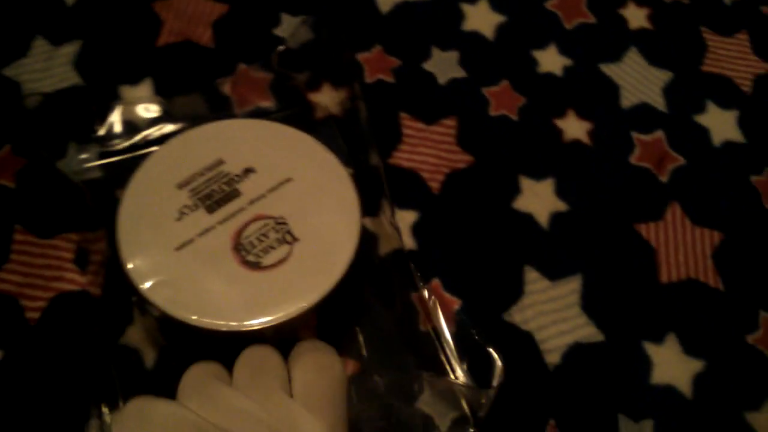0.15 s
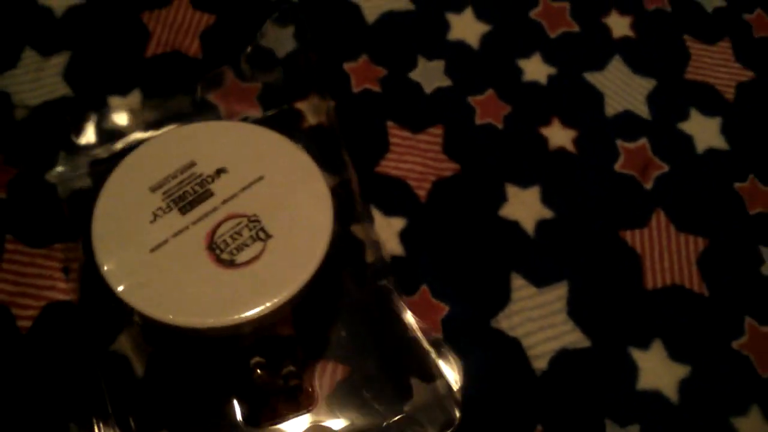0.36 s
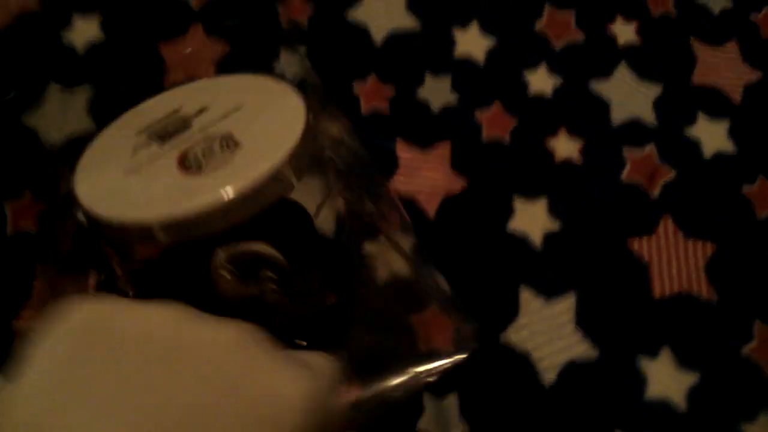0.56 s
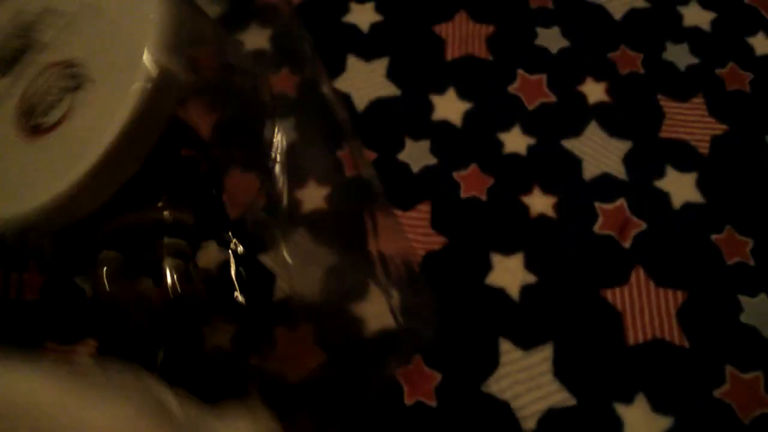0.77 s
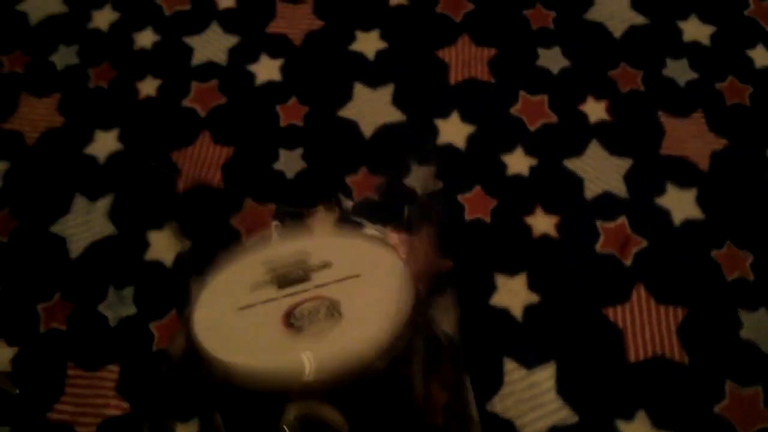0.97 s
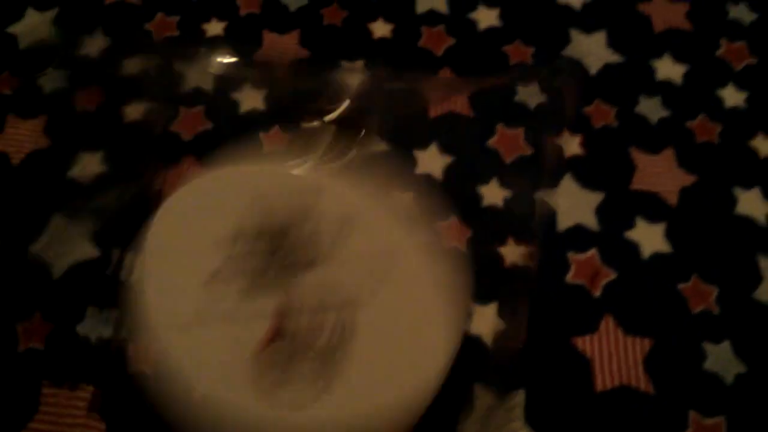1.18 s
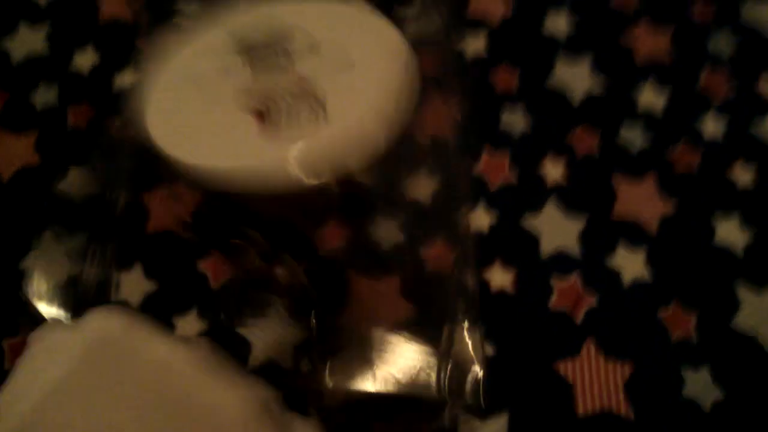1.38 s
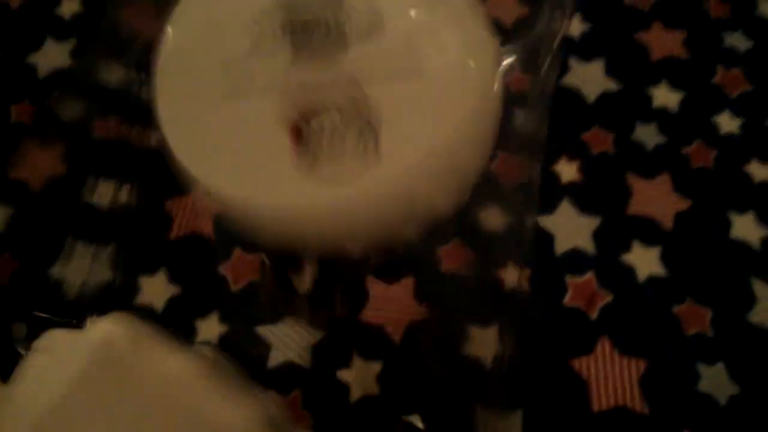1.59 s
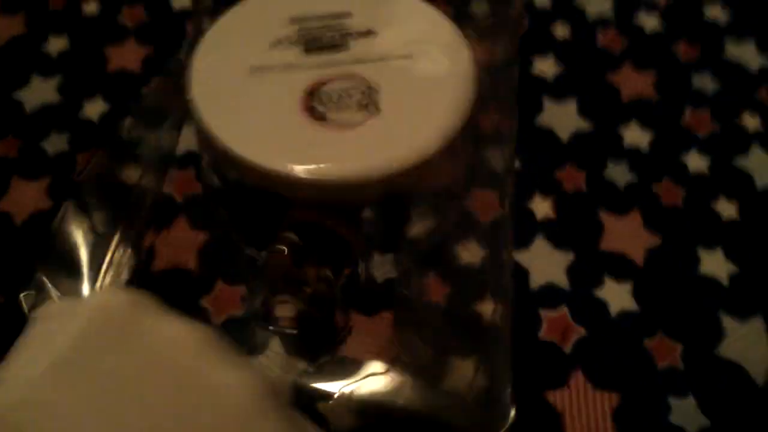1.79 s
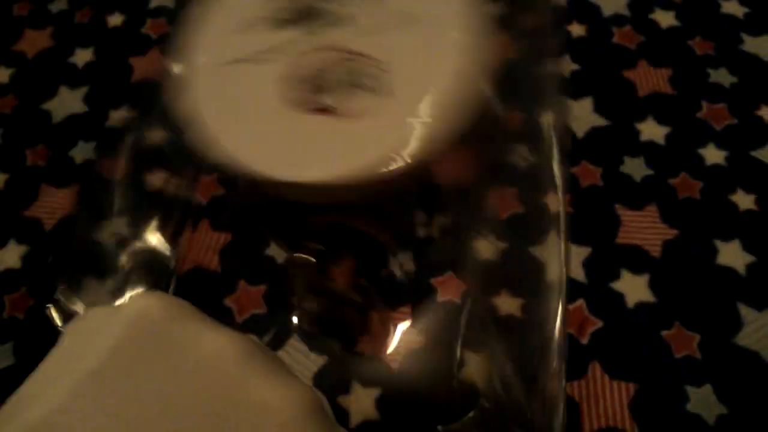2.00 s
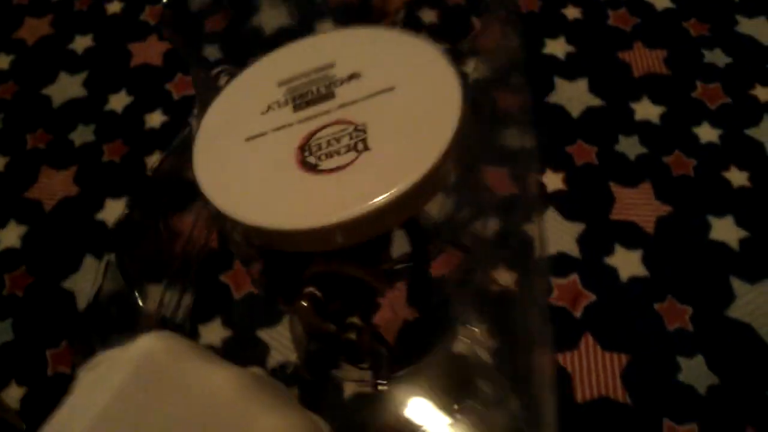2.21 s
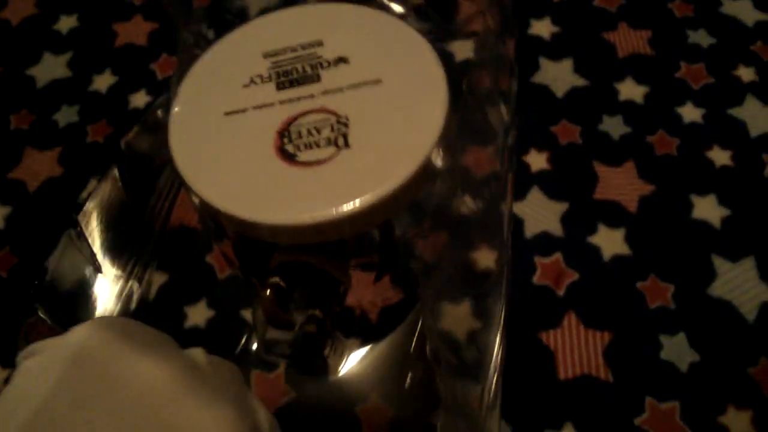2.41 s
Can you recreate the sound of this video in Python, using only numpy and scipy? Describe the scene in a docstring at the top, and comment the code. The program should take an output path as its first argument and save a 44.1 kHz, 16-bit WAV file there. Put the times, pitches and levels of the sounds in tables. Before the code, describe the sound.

A stiff plastic bag is handled close to the microphone in a small room. It gives a few loud snaps, pops hollowly once, then crumples densely before trailing off in faint crackles.

```python
"""Crumpling a stiff plastic bag

A bag with a hard disc inside is picked up and turned, close to a mono microphone in a small room.
Creases buckle in loud snaps, each ringing a panel of the sheet; taut panels pop hollowly.
Fingers knead it into a dense crumple, with low pushes of the hand. The sheet slides once with a
thin hiss and settles in tiny crackles. The loudest snaps overload the microphone."""
import sys
import numpy as np
from scipy import signal
from scipy.fft import rfft, irfft, next_fast_len
from scipy.io import wavfile

SR = 44100
rng = np.random.default_rng(int(sys.argv[2]) if len(sys.argv) > 2 else 0)


def file_out(sig):
    """Save sig as 16-bit WAV at sys.argv[1]."""
    # one column per channel
    cols = np.atleast_2d(sig).T
    # limit, then scale
    lim = np.clip(cols, -1, 1)
    pcm = np.round(lim * 32767).astype(np.int16)
    wavfile.write(sys.argv[1], SR, pcm)


N = 108045

# buckling creases (time [s], panel level [dB], panel pitch [Hz], crack level [dB], fizz level [dB])
SNAPS = [(0.127, -41.5, 1210, -52.5, -85), (0.185, -47, 1170, -58.5, -91), (0.2389, -19, 1275, -19, -36),
         (0.2523, -17, 616, -27, -65), (0.3057, -11, 1324, -14.5, -18), (0.3716, -15, 768, -27.5, -74),
         (0.4085, -5.5, 659, -11, -25.5), (0.4125, -12, 612, -32.5, -47), (0.4617, -5, 1034, -17, -25.5),
         (0.636, -27, 1029, -40, -77), (0.671, -37, 1220, -50, -80),  (0.745, -32.5, 1093, -50, -85),
         (0.776, -32, 1320, -48, -84), (0.783, -27, 1170, -43, -86), (0.8034, -12, 1105, -12.5, -9),
         (0.833, -24, 876, -31, -32.5), (0.976, -17, 849, -33.5, -60), (1.0334, -13.5, 873, -39, -69),
         (1.0446, -17, 1092, -24.5, -66), (1.056, -11.5, 1067, -49, -66), (1.147, -15.5, 1140, -24.5, -40),
         (1.1662, -11, 949, -26.5, -34.5), (1.1906, -12.5, 630, -27.5, -36.5),
         (1.209, -19, 650, -24, -33.5), (1.2561, -14.5, 670, -24, -29), (1.273, -16, 665, -31, -54),
         (1.3285, -26.5, 772, -30, -50.5), (1.3731, -7, 1407, -17, -22), (1.4432, -13.5, 861, -26, -52),
         (1.465, -19.5, 655, -28.5, -37), (1.488, -13, 890, -29.5, -68), (1.5224, -11, 1430, -18, -40),
         (1.532, -18, 652, -23, -30.5), (1.587, -23.5, 908, -33.5, -55), (1.6098, -12, 710, -23.5, -55),
         (1.619, -33, 820, -22.5, -33), (1.635, -10, 1266, -36, -64.5), (1.651, -13.5, 778, -49, -51.5),
         (1.683, -16, 1030, -23, -40), (1.7185, -31.5, 780, -31, -44.5), (1.741, -16, 923, -58.5, -74),
         (1.7648, -20, 942, -22, -44), (1.814, -19.5, 1060, -23.5, -33.5), (1.8335, -23.5, 790, -24, -53),
         (1.893, -18.5, 1000, -32, -59), (2.028, -26.5, 933, -49, -77.5), (2.0669, -28.5, 1225, -33.5, -55),
         (2.176, -27.5, 1350, -39.5, -79), (2.2111, -33, 1280, -50, -88.5)]
# panel modes (pitch ratio, level [dB], t60 [s])
PANEL_MODES = [(0.502, -8.5, 0.013), (1, 5.5, 0.012), (1.33, -8.5, 0.016), (1.8, -9.5, .01)]
# uneven shaking of a panel (pitch ratio, level [dB])
FLUTTER_SPECTRUM = [(.25, -49), (.58, -5), (1, 5.5), (1.6, -5.5), (2.4, -17), (4.5, -53)]
# crack of a crease (frequency [Hz], level [dB])
CRACK_SPECTRUM = [(1000, -35.5), (2300, 5.5), (3300, -2), (4500, 0), (5300, -9), (6400, -21.5), (7800, -39),
                  (12000, -48.5)]
# fizz of a crease (frequency [Hz], level [dB])
FIZZ_SPECTRUM = [(3500, -28.5), (5500, 3.5), (6600, 7), (8000, -5), (9300, -4.5), (10500, -12),
                 (14000, -14)]
SNAP_ATTACK_S, FLUTTER_T60_S, CRACK_T60_S, FIZZ_T60_S = 0.00058, 0.027, 0.022, 0.014


def snaps():
    """Each crease flips at once with a crack and fizz; its panel rings and shakes briefly."""
    out, t = np.zeros(N + SR), np.arange(SR // 12) / SR
    attack = 1 - np.exp(-t / SNAP_ATTACK_S)

    def unit_onset(x):  # rms 1 over the first 5 ms
        return x / np.sqrt(np.mean(x[:SR // 200] ** 2))

    def burst(spectrum, t60_s):
        return unit_onset(coloured(rng.standard_normal(len(t)) * fade(t, t60_s) * attack, spectrum))

    for start_s, panel_db, pitch_hz, crack_db, fizz_db in SNAPS:
        ring = np.zeros(len(t))
        for ratio, mode_db, t60_s in PANEL_MODES:
            gain = amp(mode_db + rng.normal(0, 4))
            mode_hz = pitch_hz * ratio * (1 + rng.normal(0, 0.029))
            ring += gain * fade(t, t60_s) * np.sin(2 * np.pi * mode_hz * t)
        highpass = signal.butter(2, pitch_hz / 2, "high", fs=SR, output="sos")
        ring = unit_onset(signal.sosfilt(highpass, ring * attack))
        flutter = burst([(ratio * pitch_hz, db) for ratio, db in FLUTTER_SPECTRUM], FLUTTER_T60_S)
        flutter_db = -1.5 + 0.14 * panel_db  # harder snaps shake more
        panel = amp(panel_db) * (ring + amp(flutter_db) * flutter)
        crack = amp(crack_db) * burst(rippled(CRACK_SPECTRUM, ripple_db=2.5), CRACK_T60_S)
        fizz = amp(fizz_db) * burst(FIZZ_SPECTRUM, FIZZ_T60_S)
        out[round(start_s * SR):][:len(t)] += panel + crack + fizz
    return out[:N]


# taut panels (time [s], pitch [Hz], level [dB], t60 [s])
POPS = [(.3055, 1017, -7, .045), (.409, 447, -3, 0.024), (.4095, 3940, -22, .035), (.462, 1040, -11, .04),
        (.8035, 622, 7.5, .016), (.806, 723.4, -11.5, .15), (.806, 927, -19, .12), (.804, 245.6, -22, .16),
        (1.222, 238, -10, .04), (1.24, 300, -20, .04), (1.475, 640, -1.5, .025), (1.658, 600, -4, .03),
        (1.873, 292.8, -12.5, 0.16), (2.0675, 2840, -14, 0.025), (2.071, 960, -23.5, .05)]
POP_ATTACK_S, POP_WAVER_RATIO = 0.0011, 0.028


def pops():
    """A taut panel flips through and rings, its pitch wavering as it settles."""
    out, t = np.zeros(N + SR), np.arange(SR // 5) / SR
    attack = 1 - np.exp(-t / POP_ATTACK_S)
    for start_s, pitch_hz, level_db, t60_s in POPS:
        waver = np.interp(t, np.linspace(0, t[-1], 20), rng.standard_normal(20))
        hz = pitch_hz * (1 + POP_WAVER_RATIO * waver)
        ring = np.sin(2 * np.pi * np.cumsum(hz) / SR)
        out[round(start_s * SR):][:len(t)] += amp(level_db) * ring * fade(t, t60_s) * attack
    return out[:N]


# hand squeezes (peak time [s], crumple level [dB], push level [dB], rise [s], fall [s])
SQUEEZES = [(0.256, -20, -38.5, 0.0075, 0.0073), (0.412, -19.5, -26, 0.0032, 0.047),
            (0.55, -29, -64.5, 0.026, 0.014), (0.901, -39.5, -49, 0.1, 0.17),
            (1.061, -18.5, -30, 0.032, 0.038), (1.194, -16.5, -26.5, 0.033, 0.067),
            (1.268, -22, -18, 0.043, 0.062), (1.453, -11, -27, 0.012, 0.038),
            (1.5, -21.5, -29, 0.012, 0.053), (1.644, -16.5, -17.5, 0.039, 0.027),
            (1.704, -20, -20, 0.022, 0.03), (1.83, -26, -32.5, 0.045, 0.055),
            (1.907, -19, -26.5, 0.02, 0.017), (1.969, -55.5, -37.5, 0.044, 0.069),
            (2.066, -34, -44.5, 0.0073, 0.0059)]
# dull creases (frequency [Hz], level [dB])
CREASE_SPECTRUM = [(40, -29.5), (150, -23.5), (280, -4), (680, 4.5), (1050, 3), (1400, -1), (1800, -13.5),
                   (4300, -34.5), (12000, -83)]
# sharp creases (frequency [Hz], level [dB])
TICK_SPECTRUM = [(800, -25), (2300, 0), (4600, -2), (6400, -16), (8000, -29), (13500, -37)]
# low push on the bag (frequency [Hz], level [dB])
PUSH_SPECTRUM = [(20, -30.5), (45, -9), (80, -4.5), (200, -7.5), (290, 3), (420, -7.5), (800, -44),
                 (2000, -67.5)]
CREASE_DB, TICK_DB = 0.5, -18.5  # re crumple level


def crumple(t):
    """Each squeeze flips small creases, dull ones densely, sharp ones sparsely, and pushes the bag."""
    effort, push = np.zeros(N), np.zeros(N)
    for peak_s, crumple_db, push_db, rise_s, fall_s in SQUEEZES:
        from_peak = np.maximum((peak_s - t) / rise_s, (t - peak_s) / fall_s)
        swell = np.exp(-from_peak ** 1.22)
        effort += amp(crumple_db) * swell
        push += amp(push_db) * swell
    dull = amp(CREASE_DB) * grains(CREASE_SPECTRUM, per_s=380, spread_db=2.2)
    first_s, last_s = SQUEEZES[0][0], SQUEEZES[-1][0]
    sharp = amp(TICK_DB) * crackles(TICK_SPECTRUM, first_s, last_s, per_s=160, spread_db=4.8)
    return effort * (dull + sharp) + push * noise(PUSH_SPECTRUM)


# sliding hiss (frequency [Hz], level [dB])
SLIDE_SPECTRUM = [(800, -40), (2500, 3.5), (4500, -4), (7000, -13), (10000, -19), (14000, -21.5)]
SLIDE_START_S, SLIDE_END_S, SLIDE_FADE_S, SLIDE_DB = 0.4, 0.616, 0.012, -48


def slide(t):
    """The sheet slides with a thin, grainy hiss."""
    inside_s = np.minimum(t - SLIDE_START_S, SLIDE_END_S - t)
    gate = np.clip(inside_s / SLIDE_FADE_S + 1, 0, 1)
    return amp(SLIDE_DB) * gate * grains(SLIDE_SPECTRUM, per_s=4000, spread_db=7.8)


# settling crackles (frequency [Hz], level [dB])
SETTLE_SPECTRUM = [(1000, -17.5), (2200, 6.5), (5000, 0.5), (9000, -8), (14000, -16.5)]
SETTLE_DB = -53


def settle():
    """The bent sheet relaxes in tiny sharp crackles after a hard snap."""
    return amp(SETTLE_DB) * crackles(SETTLE_SPECTRUM, start_s=0.87, end_s=0.97, per_s=80, spread_db=4)


BEND_SCALE_S, BEND_ZERO_DELAY_HZ = 0.0013, 2450


def bending_waves(x):
    """Treble crosses the sheet faster than bass, so every click sweeps quickly downward."""
    size = next_fast_len(N + SR // 2)
    hz = np.fft.rfftfreq(size, 1 / SR)
    lag_cycles = BEND_SCALE_S * (2 * np.sqrt(BEND_ZERO_DELAY_HZ * hz) - hz)
    return irfft(rfft(x, size) * np.exp(-2j * np.pi * lag_cycles), size)[:N]


# room tail (frequency [Hz], t60 [s])
ROOM_DECAY = [(150, 0.12), (1100, 0.44), (4000, .3), (12000, 0.35)]
# colour of the reflections (frequency [Hz], gain [dB])
ROOM_COLOUR = [(100, 5.5), (450, 1), (750, -3.5), (1180, 1.5), (1900, -4.5), (4300, -1.5), (5600, -8.5),
               (13000, -5.5)]
TAIL_DB, EARLY_DB = -17.5, -8.5  # before colouring
ROOM_ONSET_S, EARLY_T60_S = 0.011, 0.071


def room(x):
    """Near surfaces reflect first, then a short tail dies band by band; a new response each call."""
    hz, frame_s, bands = signal.stft(rng.standard_normal(SR // 2), SR, nperseg=256)
    t60_s = log_interp(ROOM_DECAY, hz)[:, None]
    tail = signal.istft(bands * fade(frame_s, t60_s), SR, nperseg=256)[1]
    t = np.arange(len(tail)) / SR
    early = rng.standard_normal(len(t)) * fade(t, EARLY_T60_S)
    onset = np.clip(2 * t / ROOM_ONSET_S - 1, 0, 1)
    parts = [(TAIL_DB, tail * onset), (EARLY_DB, early * onset)]
    response = sum(amp(db) * part / np.linalg.norm(part) for db, part in parts)
    return signal.fftconvolve(x, coloured(response, ROOM_COLOUR))[:N]


def moving_reflections(x, t):
    """The reflections change as the bag moves: a crossfade through eight room responses."""
    centres_s, step_s = np.linspace(0, t[-1], 8, retstep=True)
    return sum(room(x * np.clip(1 - np.abs(t - s) / step_s, 0, 1)) for s in centres_s)


# quiet room (frequency [Hz], level [dB])
ROOM_TONE_SPECTRUM = [(25, -12), (60, -7.5), (200, -25), (1100, -16), (12000, -47)]
ROOM_TONE_DB = -66


def room_tone():
    """Faint, steady noise of the room."""
    return amp(ROOM_TONE_DB) * noise(ROOM_TONE_SPECTRUM)


def crackles(spectrum, start_s, end_s, per_s, spread_db):
    """Small flips at random times, each a burst with its own resonances; rms 1 while they last."""
    out, t = np.zeros(N + SR), np.arange(SR // 50) / SR
    for at_s in rng.uniform(start_s, end_s, int(per_s * (end_s - start_s))):
        burst = rng.standard_normal(len(t)) * fade(t, t60_s=0.016)
        tick = unit_rms(coloured(burst, rippled(spectrum, ripple_db=5.5)))
        out[round(at_s * SR):][:len(t)] += amp(spread_db * rng.uniform(-1.5, 1)) * tick
    return unit_rms(out[:N]) * np.sqrt((end_s - start_s) * SR / N)


def grains(spectrum, per_s, spread_db):
    """Tiny clicks of uneven size and spacing, rms 1."""
    gap, size, sign = rng.random((N // 4, 3)).T
    at = (np.cumsum(2 * gap) * SR / per_s).astype(int)
    strength = np.sign(sign - 0.5) * amp(spread_db * np.sqrt(3) * (2 * size - 1))
    clicks = np.bincount(at[at < N], strength[at < N], N)
    return unit_rms(coloured(clicks, spectrum))


def rippled(spectrum, ripple_db):
    """A crease's own resonances: random peaks and dips on a spectrum."""
    hz = np.geomspace(spectrum[0][0], spectrum[-1][0], 28)
    return np.column_stack([hz, log_interp(spectrum, hz) + ripple_db * rng.standard_normal(len(hz))])


def noise(spectrum):
    """Coloured noise, rms 1."""
    return unit_rms(coloured(rng.standard_normal(N), spectrum))


def coloured(x, spectrum):
    """Minimum-phase filter from (frequency [Hz], gain [dB]) points."""
    size = 2 * next_fast_len(len(x) // 2 + 2048)
    gain = amp(log_interp(spectrum, np.fft.rfftfreq(size, 1 / SR)))
    cepstrum = irfft(np.log(gain), size)
    cepstrum[1:size // 2] *= 2
    cepstrum[size // 2 + 1:] = 0
    return irfft(rfft(x, size) * np.exp(rfft(cepstrum)), size)[:len(x)]


def log_interp(points, hz):
    """Interpolate (frequency [Hz], value) points on a log axis."""
    points_hz, values = np.transpose(points)
    return np.interp(np.log(hz + 1), np.log(points_hz + 1), values)


def fade(t, t60_s):
    """Decay of 60 dB per t60_s."""
    return np.exp(-np.log(1000) * t / t60_s)


def amp(db):
    """Decibels to gain."""
    return 10 ** (np.asarray(db) / 20)


def unit_rms(x):
    """Scale to rms 1."""
    return x / np.sqrt(np.mean(x ** 2) + 1e-20)


def scene():
    """Bag, reflections and room tone, alike on both channels."""
    t = np.arange(N) / SR
    rustle = crumple(t) + slide(t) + settle() + pops()
    direct = bending_waves(snaps() + rustle)
    into_room = bending_waves(snaps() + rustle)  # same snap times, new random detail
    mono = direct + moving_reflections(into_room, t) + room_tone()
    return np.array([mono, mono])


OVERLOAD_CEILING, LOWPASS_HZ = 0.98, 14500


def record(dry):
    """Microphone overload flattens the peaks; a steep low-pass limits the band."""
    clipped = dry / (1 + np.abs(dry / OVERLOAD_CEILING) ** 6) ** (1 / 6)
    size = next_fast_len(N + SR // 2)
    hz = np.fft.rfftfreq(size, 1 / SR)
    return irfft(rfft(clipped, size) / (1 + (hz / LOWPASS_HZ) ** 50), size)[:, :N]


dry = scene()
out = record(dry)
file_out(out)
```